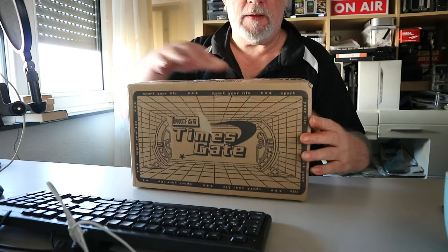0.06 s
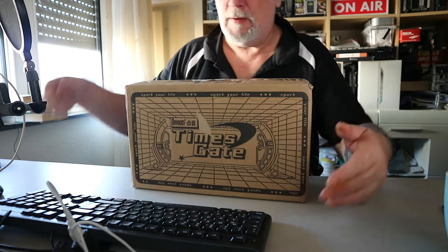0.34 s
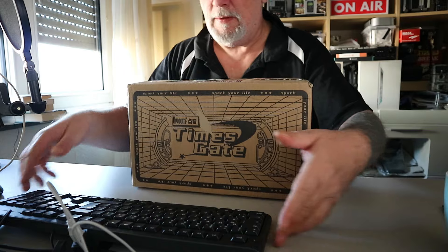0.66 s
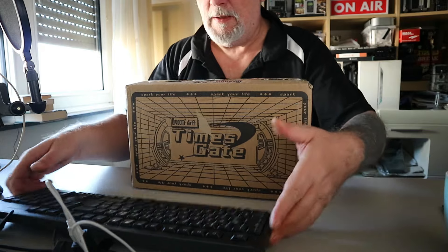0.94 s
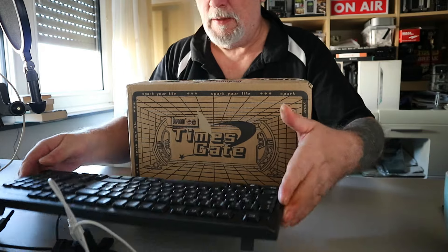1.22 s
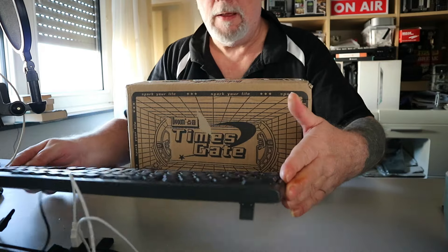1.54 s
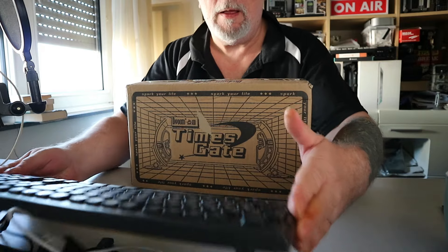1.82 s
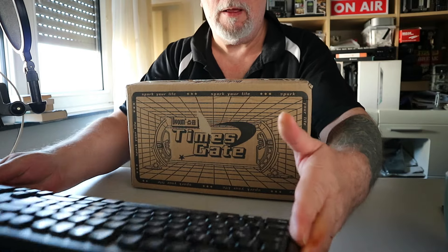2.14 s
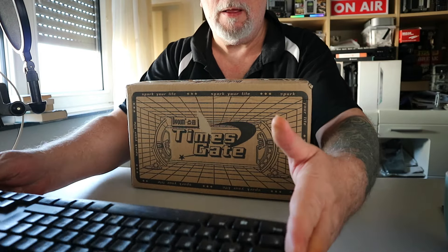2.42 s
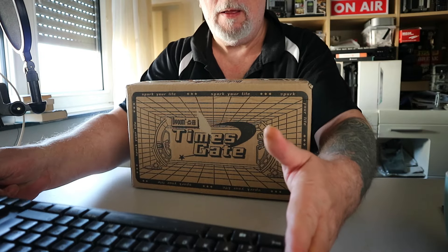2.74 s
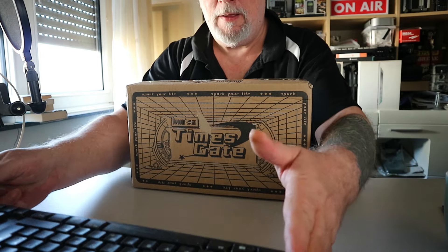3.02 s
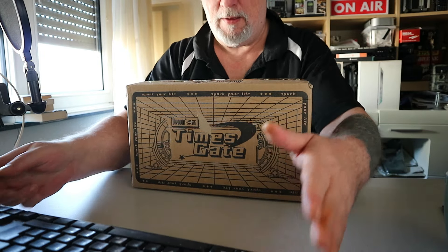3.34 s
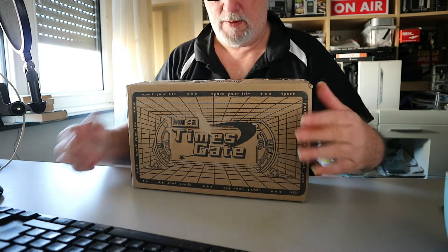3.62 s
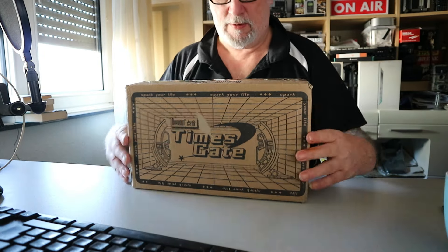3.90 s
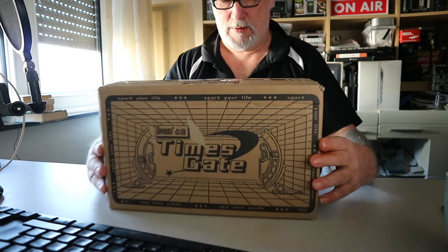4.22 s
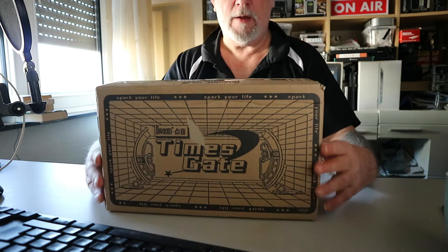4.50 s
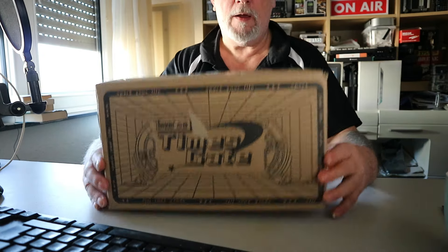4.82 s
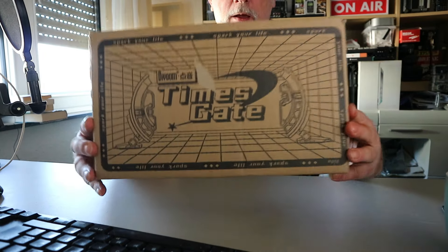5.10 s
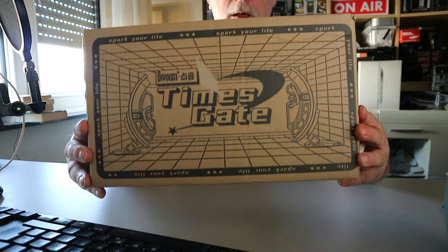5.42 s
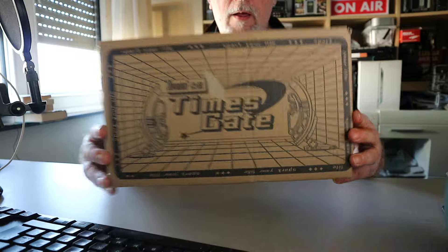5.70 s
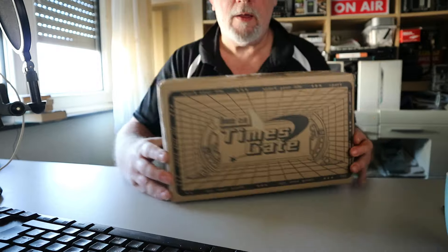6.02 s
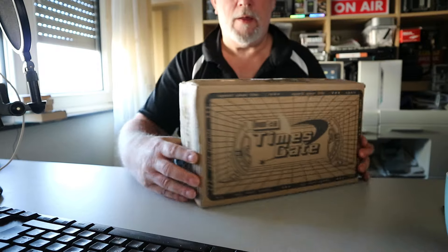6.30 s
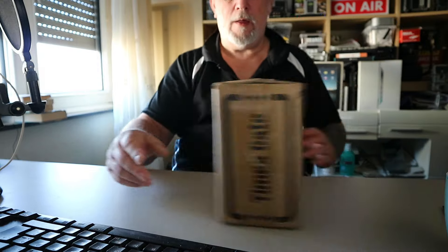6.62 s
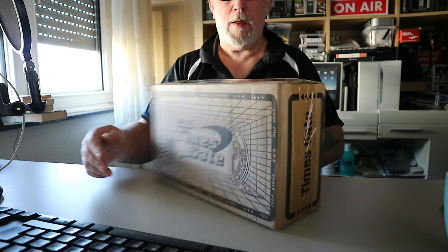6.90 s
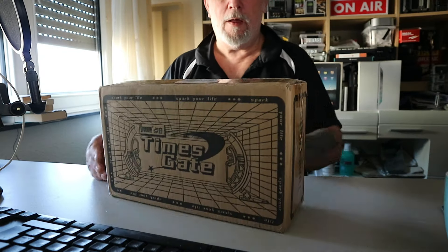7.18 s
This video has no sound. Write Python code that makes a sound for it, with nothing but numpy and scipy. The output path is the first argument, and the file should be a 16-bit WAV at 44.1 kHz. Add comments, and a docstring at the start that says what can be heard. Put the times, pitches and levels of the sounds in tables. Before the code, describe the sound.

Close plastic clacks and squeaks from a keyboard pushed along a desk, followed by a cardboard box being handled, thudding down and scraping around.

```python
"""A small furnished room hums; a hand brushes a cardboard box and a faint low tone dies away.
From 0.6 s a plastic keyboard is pushed across a desk, close by: friction makes its feet groan, skid and
squeak, and its knocks excite the modes of case and desk and rattle the keycaps. From 3.9 s two hands rub
and bump the box, ringing its panels, then lift it with short creaks. Its edge drags faintly; near 6.4 s
it is set down with a thud and swivelled, its base scraping and its edge snagging on the desk top."""
import sys
import numpy as np
from scipy import signal
from scipy.fft import rfft, irfft
from scipy.io import wavfile
from scipy.ndimage import uniform_filter1d, map_coordinates

SR = 44100
rng = np.random.default_rng(int(sys.argv[2]) if len(sys.argv) > 2 else 0)


def waveform_to_disk(signal):
    """Save audio, clipped to [-1, 1], as 16-bit WAV at the path in sys.argv[1]."""
    frames = np.transpose(np.atleast_2d(signal))
    scaled = np.clip(frames, -1, 1) * 32767
    samples = np.round(scaled).astype(np.int16)
    wavfile.write(sys.argv[1], SR, samples)


N = 319748
T = np.arange(N) / SR
HIT_T = T[:SR // 2]  # time axis of one impulse response

# spectrum of the room's soft rush: frequency_hz, level_db
ROOM_SPECTRUM = [(15, -44), (25, -48), (45, -3.5), (114, -6), (285, -2), (316, -6.5), (609, -10),
                 (750, -9.5), (950, -9), (2250, -12), (2600, -17.5), (4200, -27.5), (13000, -53.5)]
# resonances of the hum: pitch_hz, level_db, t60_s
HUM_MODES = [(123.6, 3.5, 0.61), (240, 3.5, 0.27), (381.8, 1.5, 0.25)]
# spectrum of the difference between two microphone ports: frequency_hz, level_db
SIDE_SPECTRUM = [(60, -71), (250, -20), (1000, -15), (2200, -16), (4000, -6.5), (8000, 2.5), (15000, 7)]

# strokes of the palms on cardboard: start_s, length_s, rub_db, hiss_db, rumble_db
STROKES = [(-0.08, 0.22, -42, -46, -41.5), (3.913, 0.21, -45.5, -45, -40.5),
           (4.064, 0.084, -39.5, -44, -47), (4.088, 0.29, -38, -43.5, -41),
           (4.298, 0.17, -47, -54.5, -42.5), (4.487, 0.33, -49, -48.5, -74), (4.622, .11, -64, -52, -65),
           (4.768, .16, -45.5, -51.5, -47), (4.896, 0.36, -49.5, -50.5, -63),
           (5.681, 0.31, -47.5, -54, -75), (6, 0.19, -46.5, -50.5, -50), (6.178, 0.27, -51.5, -58.5, -47)]
# spectrum of skin rubbing cardboard: frequency_hz, level_db
PALM_SPECTRUM = [(210, -30), (350, -20), (473, 5.5), (572, -1.5), (761, -1), (1050, -2.5), (2310, -1),
                 (2580, -7), (3660, -15.5), (5890, -26), (9940, -41), (15500, -51.5)]
# spectrum of the hollow box's rumble: frequency_hz, level_db
RUMBLE_SPECTRUM = [(25, -101), (50, -2), (100, -5.5), (125, 14), (150, 1.5), (250, 6.5), (500, -41.5)]
# fingertip taps on the lifted box: start_s, level_db, pitch_hz
TAPS = [(5.672, -37, 565), (5.716, -38, 490), (5.81, -36.5, 560)]
# three short creaks, then a faint long rasp of the box's edge dragging: start_s, length_s, level_db
CREAKS_AND_DRAG = [(5.51, 0.022, -50), (5.707, 0.021, -46.5), (5.796, .025, -46), (6.036, 0.43, -59)]
# blows on the box: start_s, slap_db, snap_db, panel_db, thud_db, chatter_s
BUMPS = [(0.042, -45, -40, -52, -44, 0.006), (4.014, -37.5, -70, -60, -38, 0.03),
         (4.027, -43, -66, -45, -31, 0.0034), (4.865, -38.5, -46, -46, -47, 0.014),
         (6.154, -40.5, -48.5, -64, -37, 0.004), (6.327, -59, -70, -54, -41, 0.0035),
         (6.366, -25, -35, -25.5, -26.5, 0.003), (6.378, -61, -38, -25.5, -60, 0.0034),
         (6.451, -40, -39.5, -56, -60, 0.0026), (6.577, -56, -38, -56, -55, 0.0099)]
# spectrum of a slap on cardboard: frequency_hz, level_db
SLAP_SPECTRUM = [(260, 0), (450, 1.5), (797, -2), (1130, -12), (1950, -15.5), (2620, -25.5), (5700, -37),
                 (15000, -65)]
# modes of the cardboard panels: pitch_hz, level_db, t60_s
PANEL_MODES = [(194.3, -1.5, 0.47), (288, 1, 0.14), (386, 12, 0.014), (550, 4, 0.048), (599, -5, 0.1),
               (840, 13, 0.012)]
# modes of the loaded box on the desk: pitch_hz, level_db, t60_s
THUD_MODES = [(54.6, 16.5, 0.081), (76, 8.5, 0.33), (125.4, -1, 0.8), (193, 3, 0.12)]
# strength of the scrape as the box turns: time_s, level_db
SCRAPE_CURVE = [(6.47, -40), (6.528, -37.5), (6.586, -29), (6.608, -33), (7.07, -30.5), (7.118, -35.5),
                (7.21, -35)]
# spectrum of cardboard scraping the desk: frequency_hz, level_db
SCRAPE_SPECTRUM = [(150, -35), (250, -2.5), (341, -14), (499, -1), (1140, -1.5), (1640, -5.5), (1950, -5.5),
                   (2400, -12), (4320, -25.5), (10200, -49.5), (15500, -56.5)]
# the box's hollow resonance, sinking as its weight shifts: time_s, pitch_hz, relative_db
HOLLOW_GLIDE = [(6.58, 716, -32), (6.72, 690, -7), (6.83, 535, -12), (6.92, 522, -0.5), (7.05, 513, -20)]
# snags of the box's edge on the desk: start_s, level_db, pitch_hz
SNAGS = [(6.153, -32, 2010), (6.903, -24, 2200), (6.921, -22, 2060), (6.998, -24, 1870)]

# pushes that slide the keyboard: start_s, length_s, rustle_db, drone_db
PUSHES = [(0.622, 0.31, -47.5, -47), (0.831, 0.35, -43, -45.5), (1.026, 0.44, -58, -67),
          (1.576, 0.53, -44, -45), (1.917, 0.11, -36, -64), (2.162, 0.15, -44.5, -40.5),
          (2.406, 0.14, -39, -53), (2.653, 0.25, -59, -45), (2.89, 0.18, -41, -48.5),
          (3.064, 0.24, -42.5, -40)]
# spectrum of plastic sliding on the desk: frequency_hz, level_db
SLIDE_SPECTRUM = [(260, -12), (450, -3), (951, -5.5), (1280, -2), (1710, -10.5), (2100, -3.5),
                  (3950, -17.5), (15000, -57.5)]
# groans of the rubber feet: start_s, length_s, level_db, from_hz, to_hz
GROANS = [(0.657, 0.15, -45.5, 425, 487), (1.717, 0.032, -37, 320, 372), (1.818, 0.099, -36.5, 365, 290),
          (1.873, .12, -39.5, 406, 395), (2.254, 0.15, -40, 300, 375)]
# spectrum of a skidding foot: frequency_hz, level_db
SKID_SPECTRUM = [(120, -51), (200, -10), (363, -2.5), (512, -11), (1090, 0), (1260, -5), (1720, -9.5),
                 (2510, -1.5), (3200, -7.5), (4600, -24.5), (11400, -51), (15000, -96)]
# tiny squeaks of the feet catching on the desk: start_s, level_db, pitch_hz
SQUEAKS = [(0.848, -32, 2250), (1.0725, -13, 2084), (1.08, -24, 2250), (1.373, -28.5, 2660),
           (2.105, -28.5, 1980), (2.27, -22, 1870), (2.4155, -25, 1930), (2.45, -24, 2480),
           (2.513, -39, 6000), (2.661, -34, 2600)]
# rattles of loose keycaps: start_s, level_db
RATTLES = [(1.303, -44), (1.398, -51), (1.525, -44), (2.036, -65), (2.527, -39.5)]
# modes of the keycaps: pitch_hz, level_db, t60_s
KEY_MODES = [(3530, 2.5, 0.0065), (4020, -5, 0.0077), (5200, -2, 0.0072)]
# knocks of the keyboard on the desk: start_s, clack_db, snap_db, case_db, shell_db, desk_db, chatter_s
KNOCKS = [(0.885, -38, -45.5, -31, -48, -33, 0.028), (0.92, -53, -52, -53, -60, -33, 0.0041),
          (1.148, -67, -46, -67, -80, -70, 0.0011), (1.302, -67, -35.5, -45, -49, -74, 0.0069),
          (1.402, -48, -40.5, -63, -60, -70, 0.011), (1.465, -40, -56, -17.5, -56, -30.5, 0.015),
          (1.497, -54, -58, -25.5, -60, -35, .003), (1.524, -26, -32.5, -16.5, -47, -36, 0.0095),
          (1.745, -63, -44, -53, -67, -77, 0.004), (2.03, -23, -31, -25, -45, -60, 0.0082),
          (2.033, -20, -28, -8.5, -28.5, -33, 0.0035), (2.158, -25, -43.5, -32.5, -28, -65, 0.0025),
          (2.163, -42, -43, -18.5, -47, -43, 0.0039), (2.338, -39.5, -48.5, -37.5, -53, -68, 0.0049),
          (2.526, -23, -25.5, -16, -32, -25, 0.0017), (2.604, -39.5, -46, -33, -60, -41, 0.00096),
          (2.87, -43, -57, -51, -65, -48, 0.002), (2.942, -43.5, -54, -53, -58, -54, 0.0032),
          (2.964, -38.5, -48, -32, -54, -54, 0.0055), (3.014, -50, -51, -40, -59, -70, 0.0038),
          (3.096, -37, -51, -31, -52, -67, 0.0036), (3.184, -37, -50, -32, -54, -44, 0.0062),
          (3.194, -25.5, -63, -24.5, -38, -35, 0.0057), (3.229, -40, -54, -35, -39.5, -33.5, 0.0037)]
# spectrum of a plastic clack: frequency_hz, level_db
CLACK_SPECTRUM = [(260, -38.5), (450, -3.5), (700, -6), (1190, -10.5), (2100, -16), (3030, -25),
                  (5500, -38), (7000, -43), (10000, -57.5), (15000, -55.5)]
# low modes of the keyboard's case: pitch_hz, level_db, t60_s
CASE_MODES = [(257, -6, 0.078), (360, 8.5, 0.036), (393, 4.5, 0.13), (625, -8, 0.11), (843, 3.5, 0.035)]
# higher modes of its plastic shell: pitch_hz, level_db, t60_s
SHELL_MODES = [(960, -3, 0.061), (1108, 5.5, 0.076), (1178, 11.5, 0.074), (1310, -7.5, 0.025),
               (1920, 1, 0.08), (2100, 0, 0.074), (2670, -4.5, 0.057), (3350, -2.5, 0.057)]
# modes of the desk top: pitch_hz, level_db, t60_s
DESK_MODES = [(92.4, -8, 0.07), (123.4, 8.5, 0.42), (190.6, 10.5, 0.15), (241, 9.5, 0.16)]
# damping by the hands, from which only a hard landing shakes free: case_db, t60_s
HAND_DAMPING = [(-17, 0.36), (-12, 2.7)]

LEAD_IN_S = .008  # a brief swell of noise leads into each hit and softens its attack
PUSH_SHAPE, STROKE_SHAPE = 0.5, 0.84  # lower exponents hold a movement's speed for longer


def undb(db):
    """Amplitude grows tenfold for every 20 dB."""
    return 10 ** (np.asarray(db) / 20)


def unit(x, size=None):
    """Normalisation to rms 1, over the first size samples or over all."""
    return x / np.sqrt(np.mean(x[:size] ** 2) + 1e-30)


def through(x, response):
    """A linear system convolves its input with its impulse response."""
    return signal.fftconvolve(x, response)[:len(x)]


def colour(x, spectrum):
    """Minimum-phase filtering: the folded cepstrum of a spectrum gives a causal response."""
    hz, db = np.transpose(spectrum)
    grid_hz = np.linspace(1, SR / 2, 2 ** 12 + 1)
    gain = undb(np.interp(np.log(grid_hz), np.log(np.sort(hz)), db))
    cepstrum = irfft(np.log(gain))
    fold = 1 + np.sign(np.fft.fftfreq(len(cepstrum)))
    return through(x, irfft(np.exp(rfft(cepstrum * fold))))


def band(x, hz, kind, order=2):
    """Maximally flat low-pass or high-pass filtering."""
    return signal.sosfilt(signal.butter(order, min(hz, SR / 2 - 1), kind, fs=SR, output="sos"), x)


def add(out, start_s, sound):
    """Superposition: a sound adds to what is already there."""
    start = max(int(start_s * SR), 0)
    out[start:start + len(sound)] += sound[:N - start]


def fade(t60_s):
    """Exponential damping by 60 dB in t60_s."""
    return np.exp(-np.log(1000) * HIT_T / t60_s)


def arch(start_s, length_s, shape):
    """Speed of an arm movement: a half sine from rest to rest, raised to a power."""
    progress = np.clip((T - start_s) / length_s, 0, 1)
    return np.maximum(np.sin(np.pi * progress), 0) ** shape


def held(start_s, length_s, attack_s, release_s):
    """Envelope with a linear rise, a hold and an exponential decay."""
    rise = np.clip((T - start_s) / attack_s, 0, 1)
    return rise * np.exp(-np.maximum(T - start_s - length_s, 0) / release_s)


def drift(rate_hz):
    """Smoothed random steps give a slow fluctuation of rms 1."""
    step = int(SR / rate_hz)
    steps = np.repeat(rng.standard_normal(N // step + 1), step)
    return unit(uniform_filter1d(steps, step)[:N])


def ring(modes):
    """Modal synthesis: an impulse response is a sum of damped sinusoids."""
    return sum(undb(db) * fade(t60_s) * np.sin(2 * np.pi * hz * HIT_T) for hz, db, t60_s in modes)


def struck(modes, lowest_hz):
    """Free vibration of a struck body, which radiates little below its lowest mode."""
    return unit(band(ring(modes), lowest_hz, "high"), size=1024)


def elsewhere(modes, detune=.025, spread_db=3):
    """Random variation of the modes' pitch and level stands for a different point of impact."""
    chance = rng.standard_normal((len(modes), 2))
    return [(hz * (1 + detune * sharper), db + spread_db * louder, t60_s)
            for (hz, db, t60_s), (sharper, louder) in zip(modes, chance)]


def resonance(x, hz, width_hz):
    """Forced resonance with a movable centre: shift down to 0 Hz, low-pass, shift back."""
    carrier = np.exp(2j * np.pi * np.cumsum(hz * np.ones(N)) / SR)
    return unit(np.real(carrier * band(x / carrier, width_hz / 2, "low")))


def slips(rate_hz, spread_db, patchy_db, patch_hz):
    """Friction is a random train of tiny slips, uneven in size and stronger in patches."""
    clicks = (rng.random(N) < rate_hz / SR) * rng.choice([-1, 1], N)
    sizes = undb(spread_db * np.minimum(rng.exponential(size=N), 5))
    return unit(clicks * sizes * undb(patchy_db * drift(patch_hz)))


def blips(contacts, rise_s, grit_db):
    """Impulse excitation: each gritty contact drives one resonance that swells and dies at once."""
    out = np.zeros(N)
    swell = HIT_T / rise_s * np.exp(1 - HIT_T / rise_s)
    for start_s, db, hz in contacts:
        roughness = undb(grit_db) * rng.standard_normal(len(HIT_T)) * fade(0.025)
        force = signal.unit_impulse(len(HIT_T)) + roughness
        add(out, start_s, undb(db) * through(force, swell * np.sin(2 * np.pi * hz * HIT_T)))
    return out


def impact(spectrum, body_db, snap_db, chatter_s, chatter_db, tail_db, tail_t60_s, lowest_hz):
    """A brief force is broadband: a swell of noise leads into a hit that snaps, chatters and rings."""
    chatter, tail = rng.standard_normal((2, len(HIT_T)))
    since_s = HIT_T - LEAD_IN_S
    swell = np.exp(-np.maximum(since_s, -since_s / .35) / chatter_s)  # rises faster than it falls
    force = undb(chatter_db) * chatter * swell + undb(tail_db) * tail * (since_s > 0) * fade(tail_t60_s)
    force[int(LEAD_IN_S * SR)] += 1
    radiated = band(colour(force, spectrum), lowest_hz, "high", order=3)
    body, snap = band(radiated, 2660, "low", order=4), band(radiated, 2480, "high", order=4)
    return undb(body_db) * unit(body, size=768) + undb(snap_db) * unit(snap, size=768)


def room_tone(tone_hz=208.3):
    """Background noise: a broadband rush, a wavering narrow-band hum and a low tone that dies away."""
    rush = unit(colour(rng.standard_normal(N), ROOM_SPECTRUM)) * undb(0.25 * drift(0.62))
    hum = unit(through(rng.standard_normal(N), ring(HUM_MODES)))
    envelope = held(0, 0.36, attack_s=0.0061, release_s=0.55) * undb(2.0 * drift(24.1))
    tone = envelope * np.sin(2 * np.pi * tone_hz * T + 0.22 * drift(35))
    return undb(-47) * rush + undb(-52) * hum + undb(-44.5) * tone


def reverberation(x, wet_db, low_t60_s, high_t60_s):
    """The diffuse field of a furnished room decays exponentially, at its own rate in each of two bands."""
    noise = rng.standard_normal(len(HIT_T))
    low = band(noise, 1800, "low", order=1) * fade(low_t60_s)
    high = band(noise, 3300, "high", order=1) * fade(high_t60_s)
    tail = (low + high) * np.clip(HIT_T / 0.0077 - .5, 0, 1)  # reflections take milliseconds to arrive
    return undb(wet_db) * through(x, tail / np.linalg.norm(tail))


def stereo_ports(x, diffuse_db, left_lead_s, tilt_db=0.27):
    """Scattering decorrelates two close microphone ports in the treble; the bass stays alike."""
    scatter = rng.standard_normal(len(HIT_T)) * fade(.13)
    side = undb(diffuse_db) * colour(through(x, scatter / np.linalg.norm(scatter)), SIDE_SPECTRUM)
    delayed = map_coordinates(x, [(T - left_lead_s) * SR], order=3)
    return np.array([x * undb(tilt_db) + side, delayed * undb(-tilt_db) - side])


def rubbed_cardboard(friction, spectrum, rub_gain, hiss_gain, rumble_gain):
    """Friction drives three bands: the panels rustle, the paper face hisses, the hollow box rumbles."""
    rub = colour(friction, spectrum)
    rustle, hiss = band(rub, 2880, "low", order=4), band(rub, 3480, "high", order=4)
    rumble = colour(friction, RUMBLE_SPECTRUM)
    return rub_gain * unit(rustle) + hiss_gain * unit(hiss) + rumble_gain * unit(rumble)


def palm_strokes():
    """Friction noise follows the palms' speed; pressure brings out a resonance of the panels."""
    rub_gain, hiss_gain, rumble_gain = np.zeros((3, N))
    for start_s, length_s, rub_db, hiss_db, rumble_db in STROKES:
        speed = arch(start_s, length_s, STROKE_SHAPE)
        rub_gain += undb(rub_db) * speed
        hiss_gain += undb(hiss_db) * speed
        rumble_gain += undb(rumble_db) * speed
    friction = slips(rate_hz=6000, spread_db=2.5, patchy_db=.8, patch_hz=90)
    tugs = slips(rate_hz=900, spread_db=2, patchy_db=1, patch_hz=30)
    panel = resonance(tugs, hz=710 * (1 + 0.12 * drift(12)), width_hz=122)
    pressure = rub_gain / rub_gain.max()
    rub = rubbed_cardboard(friction, PALM_SPECTRUM, rub_gain, hiss_gain, rumble_gain)
    return rub + undb(0.5) * pressure * rub_gain * panel


def box_handling():
    """Fingertips tap; friction drives a resonance in three short creaks, then as the box's edge drags."""
    envelope = sum(undb(db) * arch(start_s, length_s, 0.74) for start_s, length_s, db in CREAKS_AND_DRAG)
    friction = slips(rate_hz=1200, spread_db=1.5, patchy_db=1, patch_hz=100)
    return blips(TAPS, rise_s=0.002, grit_db=-29) + envelope * resonance(friction, hz=2245, width_hz=150)


def box_bumps():
    """Impacts of fingers and desk slap the cardboard and excite the modes of the panels and whole box."""
    out = np.zeros(N)
    panels, thud = struck(PANEL_MODES, lowest_hz=181), struck(THUD_MODES, lowest_hz=41.7)
    for start_s, slap_db, snap_db, panel_db, thud_db, chatter_s in BUMPS:
        slap = impact(SLAP_SPECTRUM, slap_db, snap_db, chatter_s,
                      chatter_db=-3, tail_db=-4.5, tail_t60_s=0.21, lowest_hz=215)
        add(out, start_s - LEAD_IN_S, slap)
        add(out, start_s, undb(panel_db) * panels - undb(thud_db) * thud)
    return out


def dust_ticks():
    """Sparse impulses: specks tick under the box, the louder the faster it turns."""
    time_s, level_db = np.transpose(SCRAPE_CURVE)
    speed = undb(np.interp(T, time_s, level_db)) * (T > time_s[0])
    ticks = slips(rate_hz=130, spread_db=3, patchy_db=2, patch_hz=20)
    return undb(-25) * speed * resonance(ticks, hz=3560, width_hz=3400)


def box_swivel(attack_s=0.097, bite_s=6.995, bite_width_s=0.22):
    """Sliding friction under the turning box forces resonances of its edge, hollow and bottom panel."""
    time_s, level_db = np.transpose(SCRAPE_CURVE)
    start_s = time_s[0] - attack_s
    gate = held(start_s, time_s[-1] - start_s, attack_s, release_s=0.04)
    envelope = undb(np.interp(T, time_s, level_db)) * gate
    # late in the turn the edge bites into the desk: rasp and hiss grow as the flat scrape gives way
    bite = np.exp(-((T - bite_s) / bite_width_s) ** 2)
    friction = slips(rate_hz=3000, spread_db=2.7, patchy_db=.9, patch_hz=110)
    catches = slips(rate_hz=1000, spread_db=2.2, patchy_db=1.6, patch_hz=110)
    rub = rubbed_cardboard(friction, SCRAPE_SPECTRUM, rub_gain=undb(-1.5 - 3 * bite),
                           hiss_gain=undb(-9.5 + 4 * bite), rumble_gain=undb(-11.5))
    edge_hz = 2020 * (1 + .045 * drift(22))  # shifts with the point of contact
    edge = undb(-7 + 9.5 * bite) * resonance(catches, edge_hz, width_hz=630)
    glide_s, glide_hz, glide_db = np.transpose(HOLLOW_GLIDE)
    hollow = resonance(catches, np.interp(T, glide_s, glide_hz), width_hz=125)
    hollow *= undb(np.interp(T, glide_s, glide_db))
    bottom = resonance(catches, hz=1110, width_hz=150)
    bottom *= undb(-4.5) * arch(start_s=6.68, length_s=.12, shape=STROKE_SHAPE)
    return envelope * (rub + hollow + bottom + edge) + blips(SNAGS, rise_s=0.00092, grit_db=-15.5)


def keyboard_slide():
    """Sliding friction rustles with each push and drives the case's modes into a drone."""
    rustle_gain, drone_gain = np.zeros((2, N))
    for start_s, length_s, rustle_db, drone_db in PUSHES:
        speed = arch(start_s, length_s, PUSH_SHAPE)
        rustle_gain += undb(rustle_db) * speed
        drone_gain += undb(drone_db) * speed
    friction = slips(rate_hz=4000, spread_db=2.5, patchy_db=2, patch_hz=45)
    drag = slips(rate_hz=600, spread_db=3, patchy_db=2, patch_hz=24)
    drone = unit(through(drag, struck(CASE_MODES, lowest_hz=200)))
    return rustle_gain * unit(colour(friction, SLIDE_SPECTRUM)) + drone_gain * drone


def foot_groans():
    """Friction drives a narrow resonance of a rubber foot; the pitch glides as its load changes."""
    out = np.zeros(N)
    drag = slips(rate_hz=1500, spread_db=1, patchy_db=1, patch_hz=40)
    for start_s, length_s, db, from_hz, to_hz in GROANS:
        pitch_hz = np.interp(T, [start_s, start_s + length_s], [from_hz, to_hz])
        out += undb(db) * arch(start_s, length_s, PUSH_SHAPE) * resonance(drag, pitch_hz, width_hz=36)
    return out


def foot_skid(start_s=1.0125, length_s=0.061, judder_hz=204, sag_db_per_s=52):
    """Stick-slip oscillation: one foot judders unevenly, rings the shell and weakens until it grips."""
    cycle = np.cumsum(judder_hz * (1 + .22 * drift(120))) / SR % 1
    friction = slips(rate_hz=14000, spread_db=.5, patchy_db=.3, patch_hz=200)
    sag = undb(-sag_db_per_s * np.maximum(T - start_s, 0))
    force = held(start_s, length_s, attack_s=0.0011, release_s=0.022) * sag
    judder = unit(friction * np.exp(-cycle / .6)) * force  # one decaying burst per cycle
    rasp = colour(signal.unit_impulse(len(HIT_T)), SKID_SPECTRUM)
    shell = band(ring(SHELL_MODES), 1540, "high", order=3)
    response = undb(-25.5) * rasp / np.linalg.norm(rasp) + undb(-29) * shell / np.linalg.norm(shell)
    return through(judder, response)


def key_rattle():
    """Repeated collisions: jolted keycaps click against their stems, ring and settle."""
    out = np.zeros(N)
    clicks = slips(rate_hz=900, spread_db=2, patchy_db=1, patch_hz=100)
    for start_s, db in RATTLES:
        keys = unit(through(clicks, ring(elsewhere(KEY_MODES))))
        out += undb(db) * held(start_s, length_s=0.013, attack_s=0.011, release_s=0.03) * keys
    return out


def keyboard_knocks(flat_share=0.16, seat_s=0.0095, swing_up_s=0.0041):
    """Each impact clacks the plastic and sets the case, shell and desk top in damped free vibration."""
    out = np.zeros(N)
    case, desk = struck(CASE_MODES, lowest_hz=255), struck(DESK_MODES, lowest_hz=65.5)
    lag_s = flat_share * seat_s * (1 - np.exp(-HIT_T / seat_s))  # the case rings flat until its feet seat
    case = np.interp(HIT_T - lag_s, HIT_T, case)
    case *= 1 - np.exp(-HIT_T / swing_up_s)
    for start_s, clack_db, snap_db, case_db, shell_db, desk_db, chatter_s in KNOCKS:
        clack = impact(CLACK_SPECTRUM, clack_db, snap_db, chatter_s,
                       chatter_db=-17.5, tail_db=-19, tail_t60_s=0.081, lowest_hz=467)
        shell = struck(elsewhere(SHELL_MODES), lowest_hz=890)
        damping = fade(np.interp(case_db, *np.transpose(HAND_DAMPING)))
        add(out, start_s - LEAD_IN_S, clack)
        add(out, start_s, damping * (undb(case_db) * case + undb(shell_db) * shell) + undb(desk_db) * desk)
    return out


def scene():
    """Direct sound, reverberation and background superpose; the keyboard lies slightly to the left."""
    keyboard = keyboard_knocks() + key_rattle() + keyboard_slide() + foot_groans() + foot_skid()
    keyboard += blips(SQUEAKS, rise_s=0.00026, grit_db=-17)
    box = box_bumps() + palm_strokes() + box_handling() + box_swivel() + dust_ticks()
    keyboard += reverberation(band(keyboard, 510, "high"), wet_db=-8.5, low_t60_s=0.21, high_t60_s=0.17)
    box += reverberation(band(box, 223, "high"), wet_db=-5, low_t60_s=0.27, high_t60_s=0.29)
    return (stereo_ports(keyboard, diffuse_db=-7, left_lead_s=.00003)
            + stereo_ports(box + room_tone(), diffuse_db=0, left_lead_s=0))


def record(dry):
    """Saturation and band limiting: peaks stop at full scale, then a steep low-pass cuts at 15.9 kHz."""
    return signal.sosfilt(signal.ellip(10, .2, 80, 15900, fs=SR, output="sos"), np.clip(dry, -1, 1))


dry = scene()
out = record(dry)
waveform_to_disk(out)
```